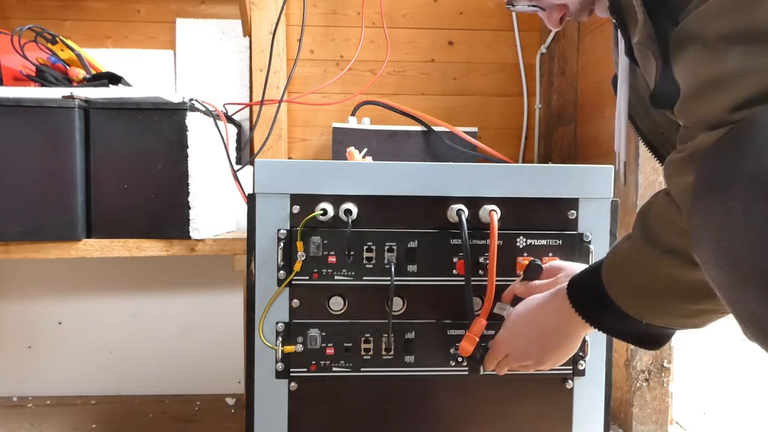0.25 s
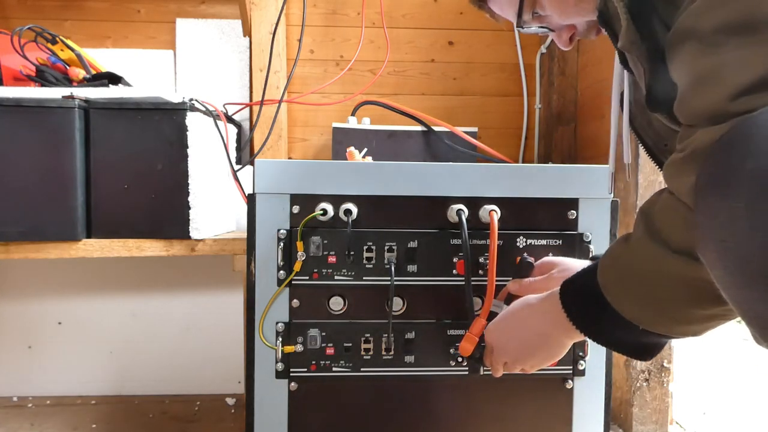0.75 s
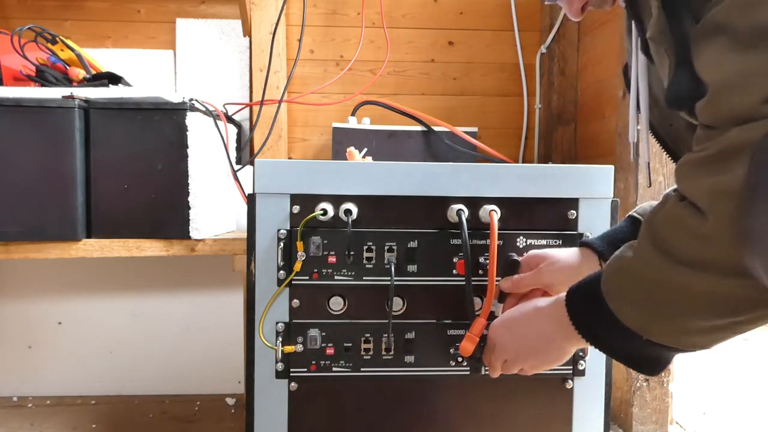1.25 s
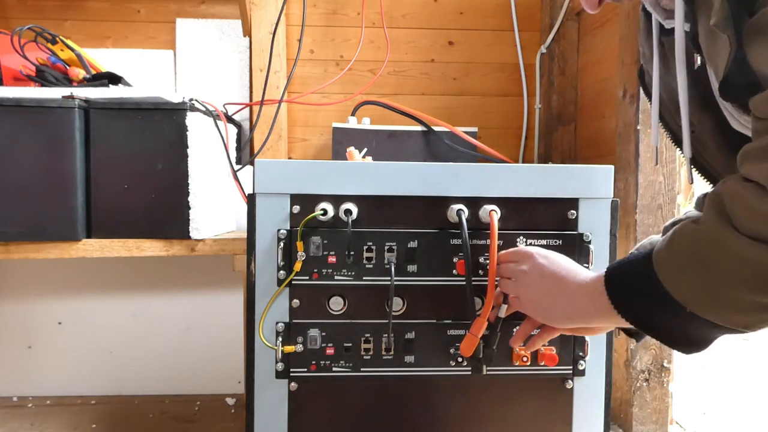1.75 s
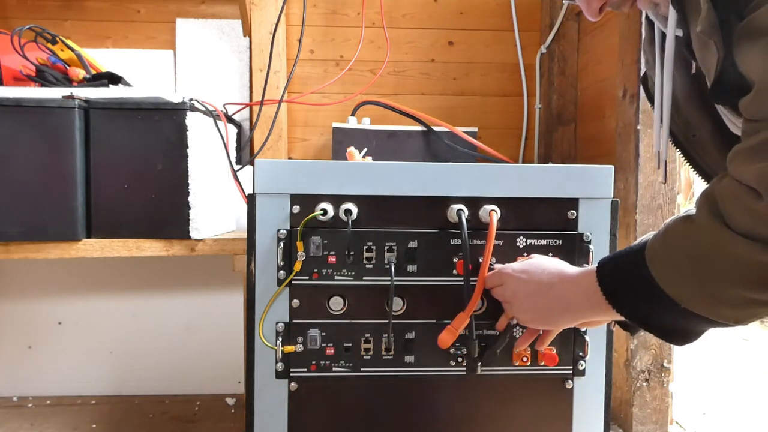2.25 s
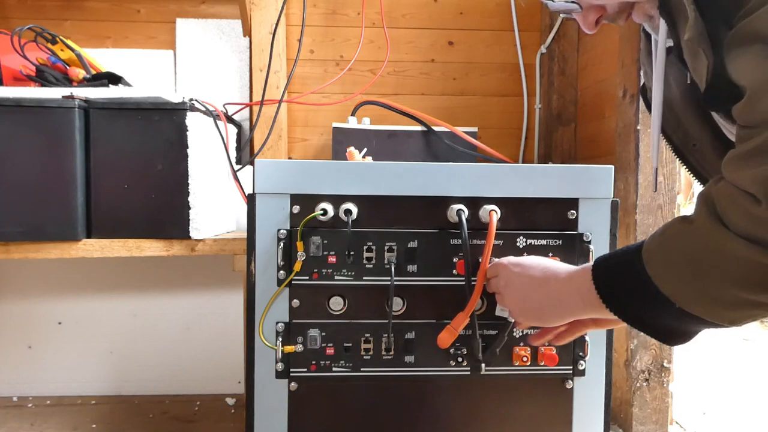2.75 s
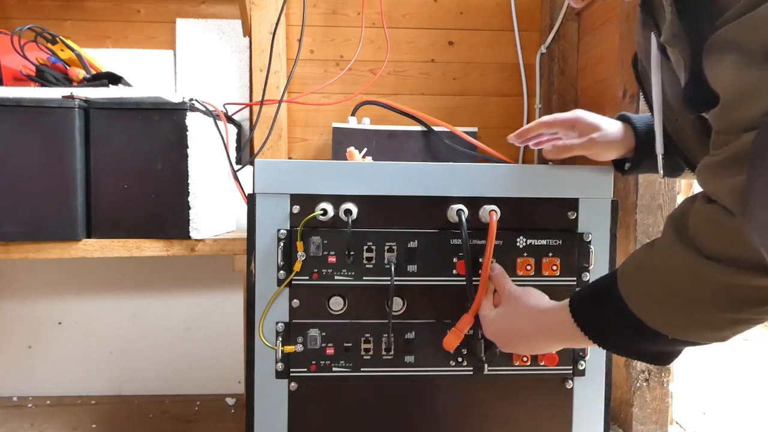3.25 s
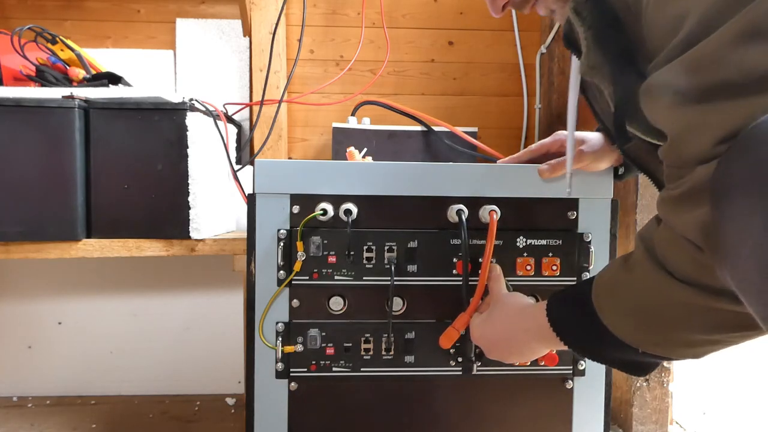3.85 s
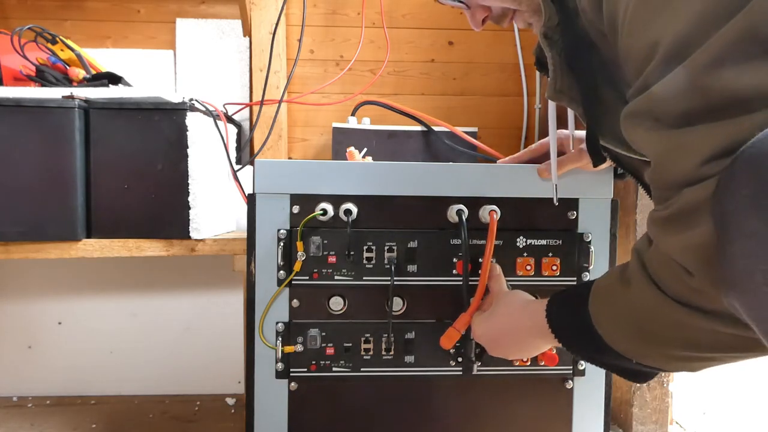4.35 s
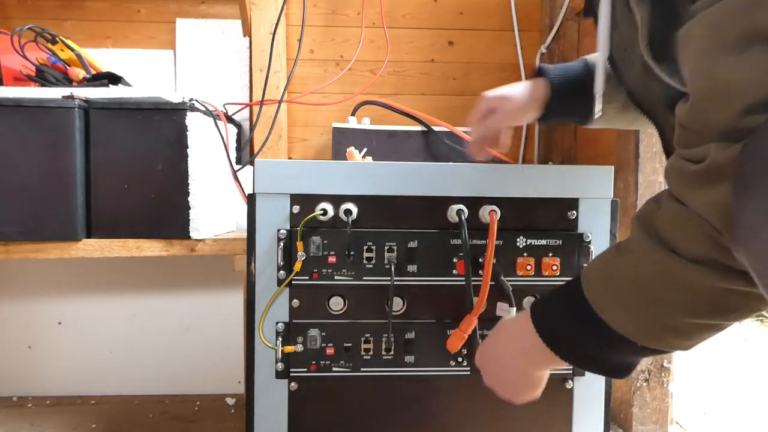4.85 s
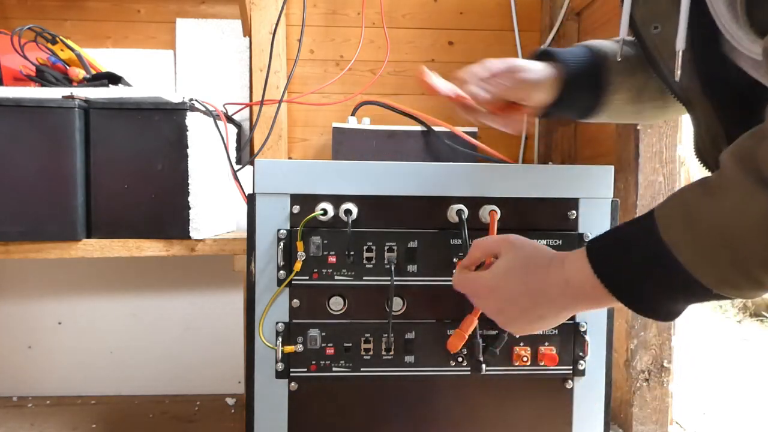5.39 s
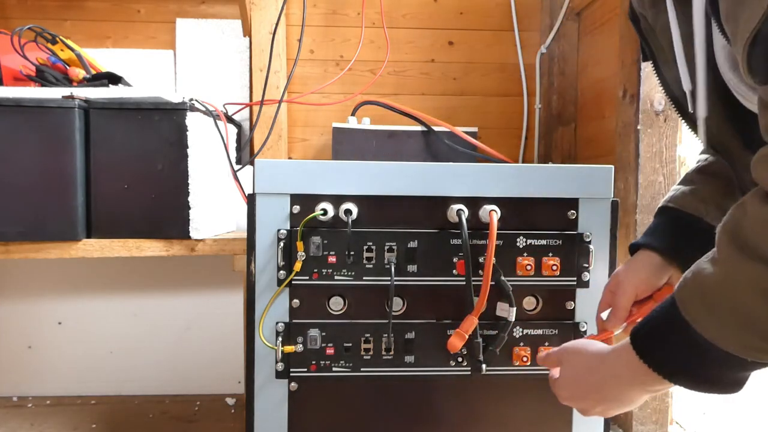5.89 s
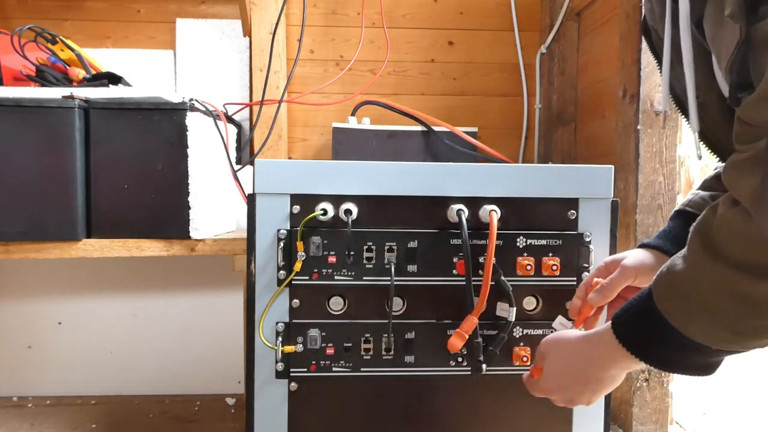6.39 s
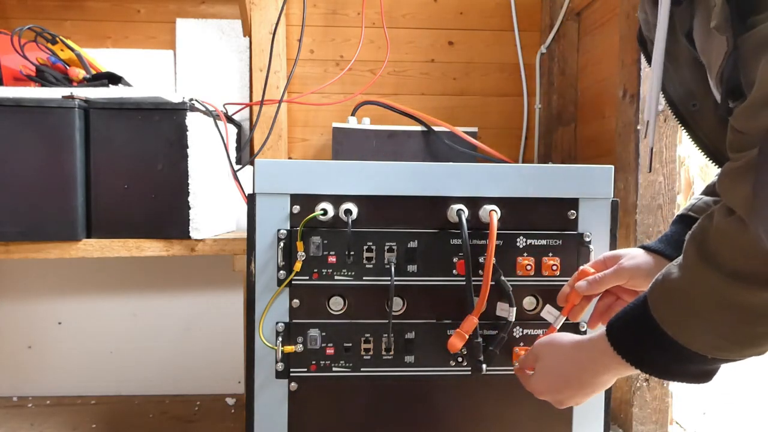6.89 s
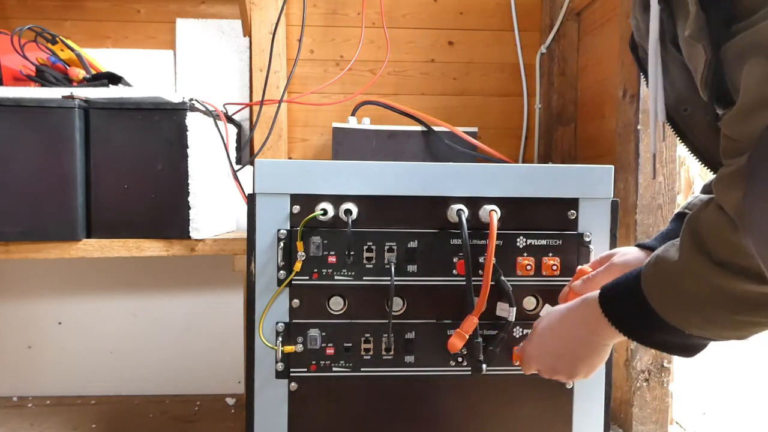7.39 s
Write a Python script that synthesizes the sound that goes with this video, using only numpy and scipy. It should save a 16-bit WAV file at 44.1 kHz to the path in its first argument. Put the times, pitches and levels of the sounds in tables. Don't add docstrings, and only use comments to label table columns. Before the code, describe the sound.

Over very quiet fan hum, hiss and a thin electronic whine, hands work cable plugs on battery units. Soft ticks and cloth rustle lead to one sharp, bright latch snap about a second in, then clustered plastic knocks and low cabinet thumps. Heavier blows follow mid-way, and a hollow plastic clatter comes near the end. Close microphone, small wooden shed, short reflections.

```python
import sys
import numpy as np
from scipy import signal
from scipy.fft import rfft, irfft
from scipy.io import wavfile
from scipy.ndimage import uniform_filter1d

SR = 44100
rng = np.random.default_rng(int(sys.argv[2]) if len(sys.argv) > 2 else 0)


def file_out(sig):
    cols = np.atleast_2d(sig).T
    lim = np.clip(cols, -1, 1)
    pcm = np.round(lim * 32767).astype(np.int16)
    wavfile.write(sys.argv[1], SR, pcm)


def gain_from_db(level_db):
    decades = np.asarray(level_db, float) / 20
    return 10 ** decades


N = 336571

# frequency in Hz, density in dB per Hz.
AIR = [(60, -30), (289, 0), (448, -14.5), (727, -9), (855, -20.5), (2470, -28.5), (8230, -30),
       (15000, -35.5)]
# frequency in Hz, width in Hz, level in dB rms.
WHINE = [(96.1, 13.7, -65), (260, 99, -59.5), (702.4, 37, -71.5), (1117, 49, -79), (2725, 16, -77.5),
         (5333, 41, -71), (5294, 170, -74), (7130, 53, -79.5), (8175, 450, -74), (9550, 370, -74),
         (13800, 400, -81), (14800, 400, -80), (2669, 77, -74.5), (5500, 690, -77)]
# frequency in Hz, likeness from 0 to 1.
LIKENESS = [(60, 0.12), (180, 0.42), (550, 0.13), (1650, 0.029), (4970, 0.73), (15000, 0.35)]
# time in seconds, level in dB rms.
COIL = [(0, -71.5), (1.5, -70.5), (3, -70), (4.5, -70.5), (5.6, -73.5), (6.4, -75.5), (6.52, -66.5),
        (6.75, -64.5), (6.9, -75), (7.63, -73)]
# time in seconds, rub level in dB.
RUSTLE = [(0, -62.5), (.5, -66), (.9, -70), (1.3, -59.5), (1.7, -64.5), (2.2, -65.5), (2.4, -69.5),
          (2.75, -63.5), (3.2, -67.5), (3.6, -64), (4.1, -67), (4.7, -60.5), (5.45, -62), (5.9, -63.5),
          (6.3, -70), (6.7, -98.5), (7.2, -70), (7.63, -78)]
# frequency in Hz, density in dB per Hz.
RUB = [(200, 7.5), (600, 6.5), (1500, -1), (3000, -7.5), (8000, -9.5), (15000, -21)]
# start in seconds, length in seconds, centre in Hz,
# width in octaves, level in dB rms.
SWISHES = [(.05, .2, 2920, 3.5, -62), (0.567, 0.091, 6000, 3, -64), (1.224, 0.09, 3000, 2.5, -62),
           (1.361, 0.14, 5000, 4.6, -64), (1.368, 0.35, 1040, 0.5, -64.5), (1.424, 0.23, 105, 1, -54),
           (1.447, 0.1, 5000, 4.6, -58), (5.14, 0.04, 400, 1.2, -53), (1.955, 0.21, 1150, 0.34, -66),
           (2.13, .11, 3000, 7.2, -62.5), (2.494, 0.18, 101, 0.85, -58), (2.694, 0.093, 8340, 1.1, -59.5),
           (3.4, 0.16, 300, 1.2, -55.5), (3.417, 0.17, 91.5, 0.91, -57), (4.198, 0.13, 90, 1.15, -47),
           (4.704, 0.1, 5000, 5.3, -62), (5.218, 0.19, 3740, 8.7, -57), (5.252, 0.16, 1200, 1.1, -56),
           (2.531, 0.14, 225, 0.27, -51), (6.015, 0.14, 5000, 2.1, -68), (6.18, .1, 8000, 2.8, -66),
           (6.845, 0.078, 1250, 1.1, -59), (4.351, .1, 141, .6, -48.5), (5.19, .07, 250, 0.87, -54.5),
           (5.046, 0.038, 500, 1.5, -56)]
# frequency in Hz, factor on t60.
SHED = [(300, 4.6), (1400, 1.45), (4000, 1.46), (10000, 1.51), (16000, 1.1)]
# start in seconds, peak in dB, pitch in Hz, width in octaves.
KNOCKS = [(0.062, -48.5, 598, 0.85), (1.019, -48.5, 1390, 0.39), (1.386, -42, 680, 1),
          (1.475, -40, 630, 0.5), (1.902, -43, 700, 0.45), (1.934, -45, 615, 0.53),
          (1.985, -37.5, 715, 0.42), (2.05, -36.5, 550, 1), (2.074, -44, 634, 0.52),
          (2.163, -47, 730, 0.97), (2.491, -34.5, 940, 0.88), (2.498, -40, 750, .51),
          (2.75, -47.5, 600, 0.87), (2.735, -49, 650, 0.44), (4.23, -44, 730, 1), (4.349, -36, 640, 0.43),
          (4.743, -41.5, 1110, 0.38), (4.829, -39, 616, 0.48), (6.988, -32.5, 1450, 0.36),
          (6.984, -36, 700, 0.6)]
# start in seconds, peak in dB, centre in Hz, width in octaves.
TICKS = [(.121, -51, 2200, 0.22), (.305, -45, 1340, 0.63), (.381, -54, 4200, .45),
         (.575, -48.5, 6200, 0.54), (1.018, -48.5, 3200, 0.92), (1.387, -46, 5500, 1.3),
         (1.495, -40, 2330, 1.3), (1.575, -47, 6000, 0.74), (1.7894, -40.5, 2430, 1.6),
         (1.789, -41, 8100, 1.1), (1.828, -50, 1790, 1.1), (1.983, -46, 1460, 0.74),
         (2.1455, -54, 12500, .4), (2.171, -53, 2820, 0.19), (2.207, -51, 7000, 1), (2.61, -50, 1460, 0.38),
         (2.669, -50, 2600, 2.7), (3.421, -43.5, 1720, 2.3), (3.495, -48.5, 3000, .55),
         (3.6806, -44, 9200, .32), (3.798, -47.5, 9900, .13), (3.8366, -45.5, 8170, 1.9),
         (4.08, -49, 9700, .19), (4.2293, -42.5, 1670, 2.1), (4.718, -39, 3430, 9.8),
         (4.741, -45.5, 1990, 0.68), (4.827, -40, 2500, 2.5), (5.06, -43.5, 9700, 0.41),
         (5.5533, -39.5, 2470, 0.62), (5.555, -43, 6500, .2)]
# start in seconds, peak in dB, pitch in Hz, t60 in seconds,
# loose rumble in dB relative to the thump.
THUMPS = [(0.204, -37.5, 238, 0.13, -25), (0.312, -35.5, 227, 0.12, -13.5),
          (1.022, -39.5, 241.6, 0.09, -12), (1.396, -33.5, 232, 0.12, -14), (1.484, -45.5, 197.6, 0.22, 3),
          (1.839, -47, 228, 0.059, -1.5), (2.057, -35, 212, 0.087, -10), (2.169, -48.5, 277, .24, 2.5),
          (2.496, -25, 210, 0.18, -17), (2.62, -44.5, 188, .14, -11), (2.884, -48.5, 242, 0.15, -2),
          (3.435, -40, 191, .19, -3.5), (4.234, -30, 200, 0.13, -12), (4.359, -23.5, 230, 0.05, -14.5),
          (4.4, -42, 204, 0.071, -17), (4.605, -46, 277, 0.061, -17), (4.745, -38, 205, 0.16, -5),
          (4.826, -43.5, 318, 0.063, -2.5), (5.083, -34, 195.5, 0.093, -5), (5.118, -44.5, 340, 0.12, -4),
          (6.751, -32, 260, 0.09, -12), (6.899, -35, 237, 0.19, -3), (6.992, -29.5, 257.7, 0.14, -9),
          (7.292, -49, 233, .14, -25)]
# start in seconds, length in seconds, start pitch in Hz,
# level in dB, end pitch as a factor.
SQUEAKS = [(.39, .05, 4300, -71, 1), (2.808, 0.045, 5500, -60, 0.96), (2.827, .03, 4550, -67, 1.05),
           (2.876, 0.051, 4560, -57.5, 0.995), (2.91, .06, 4560, -69, 1.01), (3.8, .06, 13500, -65, 1.03),
           (4.59, 0.052, 5080, -62.5, 0.97), (7.525, 0.088, 4100, -70.5, 1.01)]

# frequency in Hz, density in dB per Hz.
CLIP = [(290, -25), (500, -5), (795, -11.5), (1550, -0.5), (2000, -3), (5000, -7), (8000, -28),
        (16000, -41)]
LATCH = [(290, -54), (698, -20.5), (1870, -17), (3150, -31.5), (5400, -18), (7980, -18), (10100, -1.5),
         (16000, -37)]
CATCH = [(880, -30), (1500, -28), (2440, -37), (5540, 4), (8160, -7), (12000, 2.5), (15000, -8),
         (16000, -45)]
SOCKET = [(290, -20), (706, -2.5), (1750, -1), (2150, -8), (2850, -3.5), (7930, -11), (9700, -9.5),
          (15600, -21)]
PANEL = [(500, -6.5), (1000, -15), (1330, -11.5), (1900, -22.5), (2700, -19), (5500, -31), (9750, -23.5),
         (15500, -43)]
PLUG = [(290, -30), (500, -7), (960, -1.5), (1400, 2.5), (1770, -7), (2430, -19), (9360, -34), (16000, -62)]
# start in seconds, peak in dB, shed level in dB, t60 in seconds,
# tilt in dB per octave, thing struck.
BLOWS = [
    (0.837, -31, 1.5, 0.087, 0, CLIP),
    (1.127, -5, -6.5, 0.13, -0.2, LATCH),
    (2.011, -25, -2.5, 0.12, -3.5, CATCH),
    (2.492, -31, 9, 0.095, -0.66, PANEL),
    (4.347, -14.5, 0, .14, 0.3, SOCKET),
    (5.075, -30.5, 2.5, 0.16, -4, SOCKET),
    (5.195, -32, -4, .13, -3, LATCH),
    (6.744, -39.5, 11.5, 0.09, -4, PLUG),
    (6.8955, -26, 6.5, 0.19, 1.7, PLUG),
    (6.987, -27.5, 6.5, 0.13, -.5, PANEL),
]
# start
# in seconds, peak in dB, centre in Hz, width in octaves, shed level in dB.
RINGS = [(1.127, -37, 1275, 0.067, -7), (1.1275, -28.5, 2800, 0.55, -2.5), (2.011, -29, 12100, 0.25, -5),
         (2.491, -42, 1540, 0.26, 6), (4.348, -15, 11300, 0.35, -6.5), (5.028, -43.5, 1280, 0.3, -1),
         (5.075, -30.5, 5700, 1.2, 1), (1.1402, -22, 10300, 0.2, -8), (1.1278, -27, 14800, 0.3, 0),
         (6.8972, -23, 1730, 0.23, -4)]

# mode in Hz, level in dB, t60 in seconds.
SHELL = [(501, -12.5, 0.11), (894, -3.5, 0.12), (1082, -3, 0.088), (1297, -7, 0.11), (1480, -0.5, 0.096),
         (1730, -3, 0.12), (1840, -11, 0.31), (1970, -12, 0.3), (2105, -16, 0.24), (2729, -16.5, 0.1),
         (3100, -20, 0.19), (3810, -25, 0.095)]
SHELL_FLAT = [(419, -5, 0.27), (527, 0.5, 0.11), (734, -19, 0.06), (888, -20, 0.37), (1340, -7, 0.1),
              (1513, -15, 0.56), (1701, -8, 0.082), (1922, -24, 0.59), (2067, -10, 0.13), (2630, -16, 0.1)]
SHELL_EDGE = [(377, 1, 0.22), (560, -2, .12), (813, -4, 0.12), (1292, -5, .15), (1497, -6, .13),
              (1690, -9, .1), (1970, -15, .08), (3100, -16, .05), (3300, -18, .05)]
LID = [(549, 0, .075), (707, 0, .05), (890, -16, .06), (1078, -14, .06)]
COVER = [(350, -0.5, 0.18), (600, -5, .15), (1094, -4, .1), (1380, -16, .15), (1790, -12, .08)]
SPRING = [(7490, -16, .08), (8400, -12, .09), (9300, -6, .1), (9895, 0, .07), (10340, -3, .11),
          (10510, -3, .09), (10780, -5.5, .1), (11300, -8, .09)]
BRACKET = [(700, 2, .09), (960, -7, .08), (1257, -5, 0.13), (1590, -2, .06), (2820, -9, 0.054)]
# start in seconds, level in dB per mode, rise in milliseconds,
# left over right in dB, body.
STRIKES = [(6.7435, -40, .6, -1.1, SHELL_EDGE), (6.8965, -26.5, 0.39, -2.1, SHELL),
           (6.9005, -31.5, .3, 0, SHELL), (6.9055, -33, 0.33, 0, SHELL),
           (6.9865, -32.5, 1.1, -.6, SHELL_FLAT), (5.1745, -26.5, 2.2, -.6, LID),
           (5.1935, -31.5, 1.9, -.6, LID), (5.2085, -37, 2.1, -.6, LID), (5.077, -40.5, 1.5, -.6, COVER),
           (5.103, -43, 1.5, -.6, COVER), (1.1282, -31.5, .2, -.6, SPRING), (2.492, -40, .8, .3, BRACKET),
           (6.9855, -38, 1.5, -.6, BRACKET), (4.3485, -43, .8, -.6, SHELL)]


def evened(x):
    return x / np.sqrt(np.mean(x ** 2) + 1e-20)


def read(points, hz):
    f, value = np.transpose(points)
    return np.interp(np.log(hz + 1), np.log(f + 1), value)


def pair(z, same):
    mid, side = z[0] + 1j * z[1], z[2] + 1j * z[3]
    same = np.clip(same, -1, 1)
    a, b = np.sqrt((1 + same) / 2), np.sqrt((1 - same) / 2)
    return np.array([a * mid + b * side, a * mid - b * side])


def noise(shape_db, level_db, same, patchy_db, size):
    hop = size // 4
    frames, hz = N // hop + 5, np.fft.rfftfreq(size, 1 / SR)
    z = rng.standard_normal((frames, len(hz), 5)).T
    patches = uniform_filter1d(z[4], size=9, axis=0)
    patches = evened(uniform_filter1d(patches, size=9, axis=1))
    gain = gain_from_db(shape_db(hz)[:, None] + patchy_db * patches)
    spectra = pair(z, same(hz)[:, None]) * gain
    sound = signal.istft(spectra, nperseg=size, noverlap=size - hop)[1][:, :N]
    return gain_from_db(level_db) * evened(sound)


def whine_db(hz):
    power = 0
    for centre_hz, width_hz, db in WHINE:
        power = power + gain_from_db(2 * db) / width_hz / (1 + (2 * (hz - centre_hz) / width_hz) ** 2) ** 2
    return 10 * np.log10(power)


def room_tone():
    total_db = 10 * np.log10(sum(gain_from_db(2 * db) for _, _, db in WHINE))
    whine = noise(whine_db, total_db, lambda hz: 0.88 + 0 * hz, 0.2, size=2048)
    air = noise(lambda hz: read(AIR, hz), -59, lambda hz: read(LIKENESS, hz), 0.92, size=1024)
    return whine + air


def coil():
    t, pitch_hz = np.arange(N) / SR, 2613
    waver = evened(uniform_filter1d(rng.standard_normal(N), size=3000))
    level_db = np.interp(t, *np.transpose(COIL)) + 1.3 * waver
    phase = 2 * np.pi * pitch_hz * t + 0.39 * np.roll(waver, shift=9000)
    return np.sqrt(2) * gain_from_db(level_db - 1.0) * np.sin(phase)


def rustle():
    s, db = np.transpose(RUSTLE)
    steady_db = db.min() + 17.0
    over = np.sqrt(np.maximum(gain_from_db(2 * db) - gain_from_db(2 * steady_db), 1e-12))
    grain = noise(lambda hz: read(RUB, hz), 5.04, lambda hz: 0.27 + 0 * hz, 2.55, size=256)
    return np.interp(np.arange(N) / SR, s, over) * grain


def add(mix, s, sound):
    part = mix[:, round(s * SR):][:, :sound.shape[-1]]
    part += sound[..., :part.shape[1]]


def hump(centre_hz, octaves, size):
    hz = np.fft.rfftfreq(size, 1 / SR) + 1
    return -12.0 * abs(np.log2(hz / centre_hz) / octaves) ** 1.26 - 6.3 * (hz / 13000) ** 4


def swishes():
    out, size = np.zeros((2, N)), 16000
    for s, length, centre_hz, octaves, db in SWISHES:
        z = rng.standard_normal((3, size))
        grit = gain_from_db(0.51 * evened(uniform_filter1d(z[2], size=60)))
        sides = np.array([z[0] + 0.11 * z[1], z[0] - 0.7 * z[1]]) * grit
        brushed = evened(irfft(rfft(sides) * gain_from_db(hump(centre_hz, octaves, size=size))))
        stroke = signal.windows.tukey(min(round(length * SR), size), .7)
        add(out, s, gain_from_db(db) * stroke * brushed[:, :len(stroke)])
    return out


def causal(db):
    log_gain = np.maximum(db, -70) * np.log(10) / 20
    phase = -signal.hilbert(np.r_[log_gain, log_gain[-2:0:-1]]).imag[:len(db)]
    return irfft(np.exp(log_gain + 1j * phase))[:len(db)]


def click(colour_db, shed_db, t60, same=0.73, cut=0.059):
    hz, t = np.fft.rfftfreq(128, 1 / SR)[:, None], np.arange(180) * 32 / SR
    tail_db = -60 * t / (t60 * read(SHED, hz)) - 4.0 * (t / cut) ** 3
    likeness = same - .35 * (hz / 14000) ** 2
    spectra = pair(rng.standard_normal((4, 65, 180)), likeness) * gain_from_db(tail_db)
    tail = signal.istft(spectra, nperseg=128, noverlap=96)[1]
    tail = tail * np.minimum(np.arange(tail.shape[1]) / (0.00086 * SR), 1)
    chatter = np.zeros_like(tail)
    chatter[:, [0, 13, 26, 47, 90, 154]] = .6, 1, .5, .6, .3, .25
    colour = causal(colour_db)[None, None]
    direct, shed = signal.fftconvolve(np.array([chatter, tail]), colour, axes=2)
    return direct / abs(direct).max() + gain_from_db(shed_db - 17) * shed / shed[:, 200:900].std()


def knocks():
    out = np.zeros((2, N))
    for s, db, centre_hz, octaves in KNOCKS:
        knock = click(hump(centre_hz, octaves, size=1024), shed_db=9.5, t60=0.081, same=0.8)
        add(out, s - .0015, gain_from_db(db - 2.0) * knock)
    return out


def ticks():
    out = np.zeros((2, N))
    for s, db, centre_hz, octaves in TICKS:
        add(out, s, gain_from_db(db) * click(hump(centre_hz, octaves, size=1024), shed_db=0.5, t60=0.12))
    return out


def panel_ring(hz, t60, rise, spread, count):
    t, draw = np.arange(round(.3 * SR)) / SR, rng.uniform(-1.005, 1, (count, 3))
    order = np.arange(count)[:, None]
    detune = spread * draw[:, :1] * (order > 0)
    sag, sag_s = 0.16, 0.013
    turn = 2 * np.pi * hz * (1 + detune) * (t + sag * sag_s * (1 - np.exp(-t / sag_s)))
    sides = []
    for side in (1, -1):
        phase = 2.77 * draw[:, 1:2] + side * 0.05 * draw[:, 2:]
        sides.append((.35 ** order * np.sin(turn + phase)).sum(0))
    swell = (1 - np.exp(-t / max(rise, .0022))) ** 2
    sound = np.array(sides) * swell * gain_from_db(-60 * t / t60 - 5.9 * (t / 0.067) ** 3)
    return sound / abs(sound).max()


def thumps():
    out = np.zeros((2, N))
    soft_rise_ms, hard_from_db, quicker_ms_per_db = 8, -33.5, 0.7
    for s, db, hz, t60, rumble_db in THUMPS:
        rise_ms = soft_rise_ms - quicker_ms_per_db * max(db - hard_from_db, 0)
        add(out, s - .006, gain_from_db(db) * panel_ring(hz, t60, rise_ms / 1000, 0.2, count=3))
        rumble = click(hump(284, 1.0, size=2048), shed_db=9.2, t60=0.13, same=0.94, cut=0.15)
        add(out, s - .004, gain_from_db(db + rumble_db) * rumble)
    return out


def squeaks():
    out = np.zeros((2, N))
    for s, length, hz, db, glide in SQUEAKS:
        count = round(length * SR)
        waver = evened(uniform_filter1d(rng.standard_normal(6000), size=150))[:count]
        pitch = np.linspace(1, glide, count) + 0.022 * waver
        tone = np.sin(2 * np.pi * hz * np.cumsum(pitch) / SR)
        add(out, s, gain_from_db(db + 2.5) * np.hanning(count) * tone)
    return out


def snaps():
    out, hz = np.zeros((2, N)), np.fft.rfftfreq(1024, 1 / SR)
    pan_db = np.array([[-.25], [.25]])
    for s, db, shed_db, t60, tilt_db, thing in BLOWS:
        colour_db = read(thing, hz) + tilt_db * np.log2(hz / 1000 + 0.18)
        add(out, s + .0008, gain_from_db(db + pan_db) * click(colour_db, shed_db, t60))
    return out


def snap_rings():
    out = np.zeros((2, N))
    for s, db, centre_hz, octaves, shed_db in RINGS:
        add(out, s, gain_from_db(db) * click(hump(centre_hz, octaves, size=1024), shed_db, t60=0.12))
    return out


def struck_bodies():
    out, t = np.zeros((2, N)), np.arange(6000) / SR
    for s, db, rise_ms, pan_db, body in STRIKES:
        f, mode_db, t60 = np.transpose(body)[:, :, None]
        decay = gain_from_db(mode_db - 60 * t / np.minimum(t60, .22) - 5.0 * (t / 0.084) ** 3)
        modes = decay * (1 - np.exp(-1000 * t / max(rise_ms, .05))) ** 2
        lean = 0.27 * np.cos(f / 170)
        sides = []
        for side in (1, -1):
            tone = (modes * np.sin(2 * np.pi * f * t + side * lean)).sum(0)
            sides.append(tone * gain_from_db(db + side * pan_db / 2))
        add(out, s, np.array(sides))
    return out


def scene():
    faint = room_tone() + coil() + rustle() + swishes()
    edge = signal.firwin(255, 15300, window=("kaiser", 7), fs=SR)
    faint = signal.oaconvolve(faint, edge[None], "same")
    handling = knocks() + ticks() + thumps() + squeaks()
    return faint + handling + snaps() + snap_rings() + struck_bodies()


def low_pass(x):
    return signal.sosfilt(signal.butter(12, 16830, fs=SR, output="sos"), x)


def record(dry):
    bass_cut = signal.butter(2, 87, "high", fs=SR, output="sos")
    edge = signal.firwin(255, 16200, window=("kaiser", 9), fs=SR)
    mix = signal.oaconvolve(signal.sosfilt(bass_cut, dry), edge[None], "same")
    return low_pass(mix)


dry = scene()
out = record(dry)
file_out(out)
```